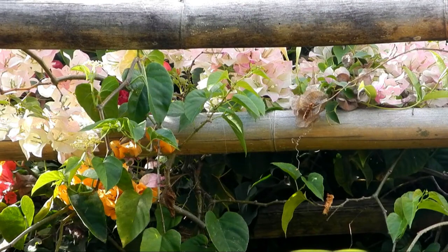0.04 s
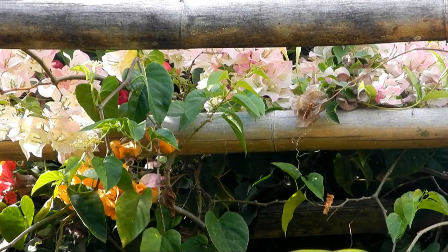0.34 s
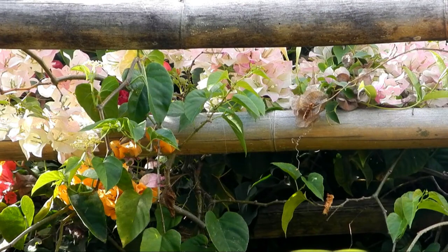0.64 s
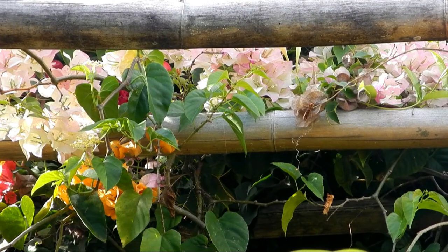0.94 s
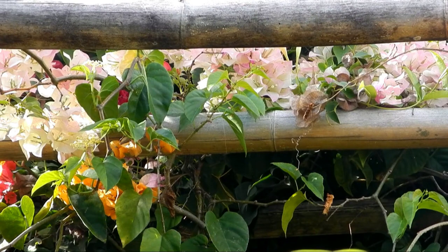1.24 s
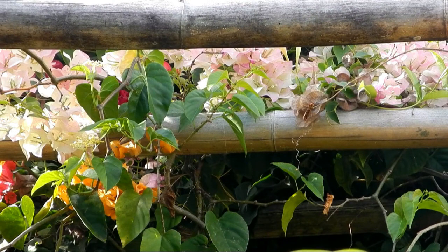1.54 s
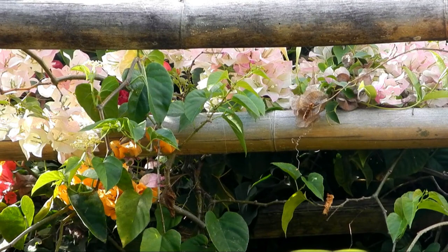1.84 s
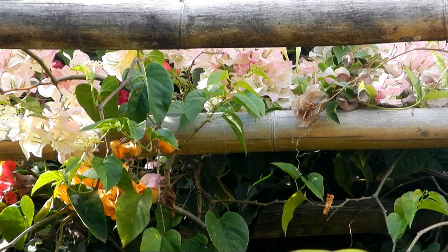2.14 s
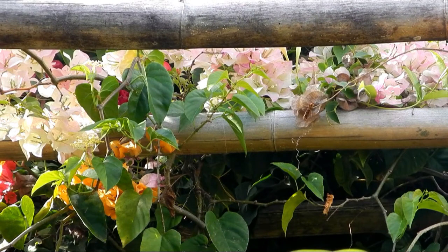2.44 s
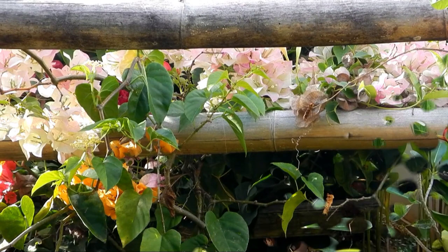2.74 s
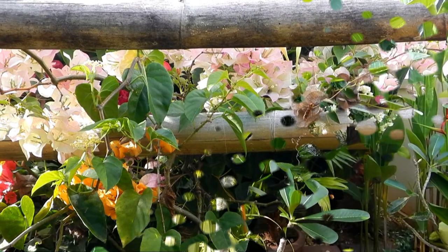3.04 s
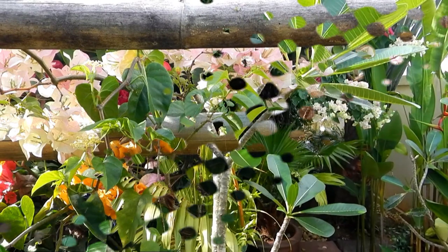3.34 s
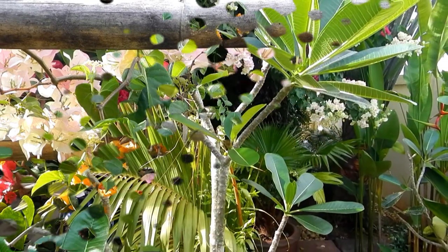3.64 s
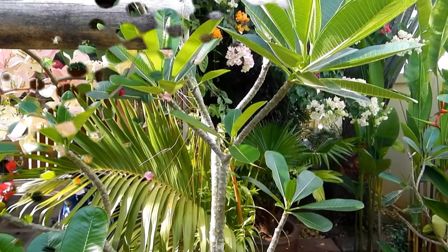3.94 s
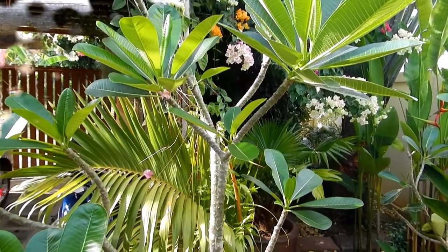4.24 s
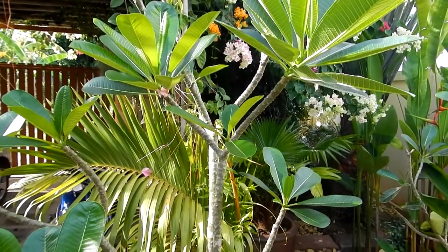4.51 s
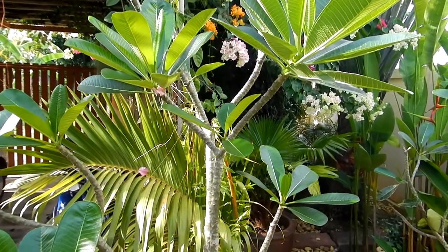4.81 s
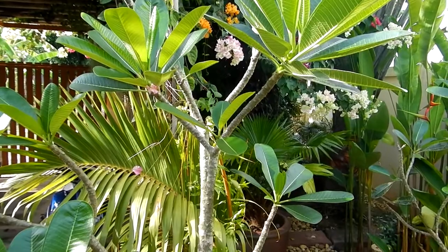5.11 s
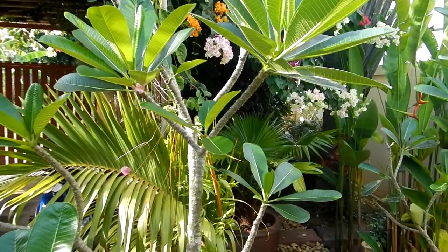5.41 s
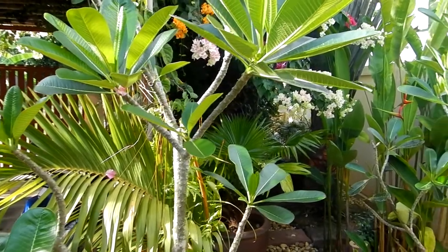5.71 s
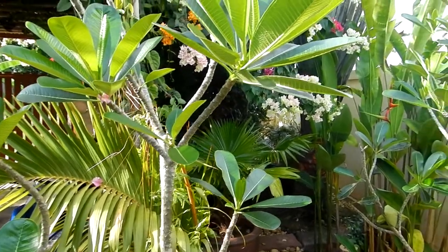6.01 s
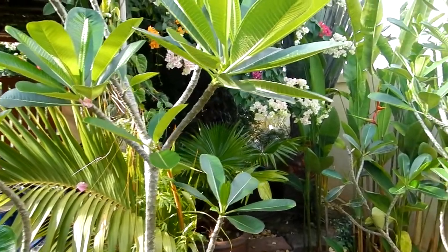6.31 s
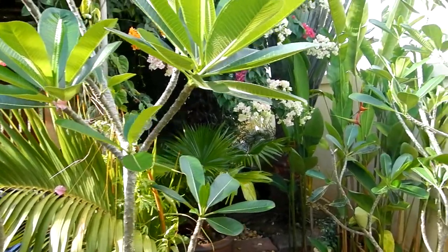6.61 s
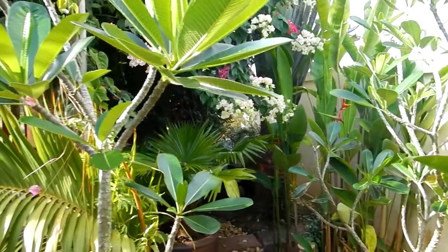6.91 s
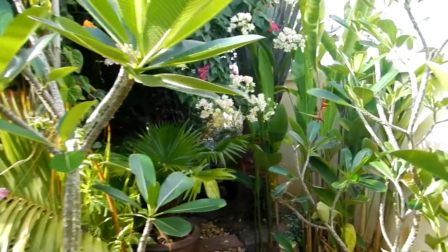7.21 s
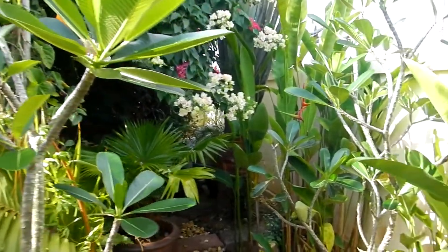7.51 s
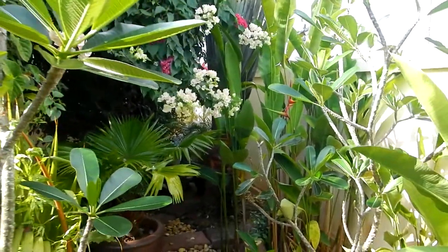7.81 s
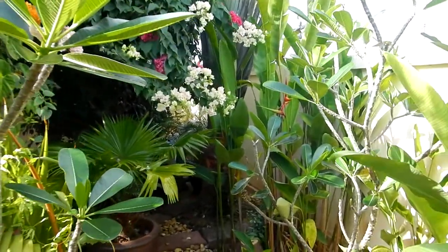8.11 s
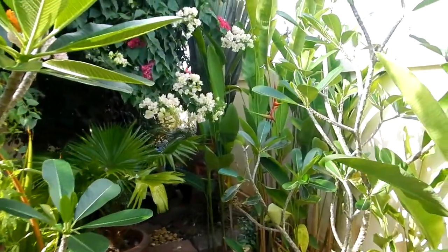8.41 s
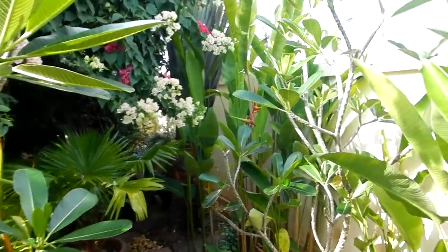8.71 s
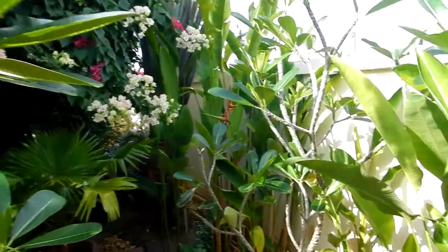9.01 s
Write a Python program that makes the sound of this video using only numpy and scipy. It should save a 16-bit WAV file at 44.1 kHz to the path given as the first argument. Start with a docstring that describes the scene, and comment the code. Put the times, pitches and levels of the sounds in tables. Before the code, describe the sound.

Birds sing and call to each other outdoors, near and far, with a soft low rumble of wind and distant traffic underneath.

```python
"""A near songbird whistles the same phrase twice in a walled tropical garden.
Another chatters and scolds; two further off answer each other with rising whoops.
Each syrinx gives a gliding tone, or a rasp when it vibrates chaotically; leaves and walls echo it.
Insects stridulate steadily, a breeze rumbles on the microphone, and a far engine passes
in a wash of town and leaves."""
import sys
import numpy as np
from scipy import signal
from scipy.fft import rfft, irfft, next_fast_len
from scipy.io import wavfile
from scipy.ndimage import uniform_filter1d

SR = 44100
rng = np.random.default_rng(int(sys.argv[2]) if len(sys.argv) > 2 else 0)


def inscribe(sig):
    """Save sig as 16-bit PCM at rate SR to the path in sys.argv[1].

    A 1-D sig is mono; a 2-D sig holds one channel per row.
    Samples are clipped to [-1, 1] before scaling.
    """
    pcm = np.round(np.clip(np.atleast_2d(sig).T, -1, 1) * 32767)
    wavfile.write(sys.argv[1], SR, pcm.astype(np.int16))


N = 403515
TIME = np.arange(N) / SR


def song(slur_accent=.85, slur_rough=.1):
    """Near songbird: a thin downward slur, then the same six whistles each time."""
    # songs: first whistle t/s, motif gain/dB, slur lead/s, slur level/dB
    songs = [(1.78, 0.36, .215, -52.5), (6.97, -0.4, .135, -46.5)]
    # slur: length/s, first f/Hz, mid f/Hz, last f/Hz
    slur = (.1, 6550, 5620, 4650)
    # whistles: offset t/s, length/s, first, mid, last f/Hz, level/dB, accent/0-1, roughness/0-1
    motif = [(0, .2, 4015, 3990, 3965, -38.5, 0.64, .24), (0.331, .16, 4120, 3412, 3063, -38, 0.69, 0.41),
             (0.677, .205, 2690, 2759, 2960, -37, 0.89, 0.22),
             (0.923, .16, 3330, 3355, 3400, -33.5, 0.5, .14),
             (1.051, .085, 3400, 3501, 3620, -33, .7, 0.44), (1.252, .16, 4194, 4340, 4390, -38, 0.28, .36)]
    rows = []
    for start_s, gain_db, lead_s, slur_db in songs:
        rows.append((start_s - lead_s, *slur, slur_db, slur_accent, slur_rough))
        rows += [(start_s + offset_s, length_s, *pitches_hz, gain_db + db, accent, rough)
                 for offset_s, length_s, *pitches_hz, db, accent, rough in motif]
    return notes(rows, waver=.0063, octave_db=-31, edge_db=-6.5)


def near_calls(rise_bow=.68, drop=.93, fall_bow=.72, rise_accent=.68, fall_accent=.42, rough=.5):
    """Husky rises, each followed by a fall from just under its top, and single whistles."""
    # two-note calls: t/s, rise/s, fall/s, first, top, last f/Hz, rise level/dB, fall level/dB
    up_downs = [(1.501, 0.12, 0.12, 2966, 3603, 2480, -40, -48),
                (3.458, 0.081, 0.2, 2195, 3073, 1980, -36.5, -49),
                (4.817, .12, 0.095, 3030, 3440, 2580, -39.5, -42.5)]
    # whistles: t/s, length/s, first, mid, last f/Hz, level/dB, accent/0-1, roughness/0-1
    whistles = [(3.39, .084, 2035, 2055, 2090, -49, .4, 0.11),
                (7.41, .276, 3124, 3132, 3420, -44.5, 0.14, .24)]
    rows = []
    for start_s, rise_s, fall_s, first_hz, top_hz, last_hz, rise_db, fall_db in up_downs:
        turn_hz = drop * top_hz
        rise_hz = (first_hz, first_hz + rise_bow * (top_hz - first_hz), top_hz)
        fall_hz = (turn_hz, turn_hz + fall_bow * (last_hz - turn_hz), last_hz)
        rows.append((start_s, rise_s, *rise_hz, rise_db, rise_accent, rough))
        rows.append((start_s + rise_s, fall_s, *fall_hz, fall_db, fall_accent, rough))
    return notes(rows + whistles, waver=.014, octave_db=-34, edge_db=-5)


def chatter(count=8, gap_s=.1695, end_s=.772, level_db=-34, end_pitch=.96, sag_per_s=.0954):
    """A husky phrase repeated at sinking pitch, already echoing as the scene opens."""
    # notes: offset t/s, length/s, first, mid, last base f/Hz, gain/dB, accent/0-1, roughness/0-1
    phrase = [(-.028, 0.044, 3100, 2660, 2540, 1, 0.93, 0.57),
              (0.019, 0.024, 2890, 3155, 3040, -7, 0.54, 0.66),
              (.032, 0.0156, 3530, 3820, 3680, -14.5, 0.36, .6),
              (0.056, 0.038, 2320, 2073, 1940, -6.5, 0.65, 0.75)]
    rows = []
    for before_s in gap_s * np.arange(count):
        start_s = 1 + end_s - before_s  # 1 s run-up, cut below
        pitch = end_pitch + sag_per_s * before_s
        rows += [(start_s + offset_s, length_s, *pitch * np.array(base_hz), level_db + db, accent, rough)
                 for offset_s, length_s, *base_hz, db, accent, rough in phrase]
    voice = notes(rows, waver=.0245, octave_db=-47, edge_db=-10)
    heard = garden(voice, direct_db=-1, early_db=-7, tail_db=-1, spread=.8, pan_db=-.5)
    return np.pad(heard[:, SR:], ((0, 0), (0, SR)))


def scolds():
    """Chaotic syrinx vibration: rasps around a falling pitch."""
    # harsh scolds: t/s, length/s, first f/Hz, last f/Hz, width/Hz, level/dB
    harsh = [(7.694, 0.062, 5770, 5110, 1270, -45), (7.732, 0.05, 4250, 2600, 1800, -45.5),
             (7.871, 0.04, 5960, 3850, 1500, -44), (8.222, 0.074, 9810, 8540, 4000, -58.5),
             (8.251, 0.044, 6080, 4530, 1500, -44.5), (8.266, .0483, 3910, 2985, 734, -35.5)]
    # a small bird's thin chips: t/s, level/dB
    chips = [(.01, -51), (.612, -61), (1.118, -58.5), (1.638, -59), (2.659, -56.5), (3.267, -62),
             (3.877, -60), (5.23, -61), (6.23, -60), (6.612, -56)]
    # one chip: length/s, first f/Hz, last f/Hz, width/Hz
    chip = (.05, 5550, 5050, 1460)
    out = np.zeros(N)
    for start_s, length_s, first_hz, last_hz, width_hz, db in harsh + [(s, *chip, db) for s, db in chips]:
        hz = np.linspace(first_hz, last_hz, int(length_s * SR))
        rasp = (chaos(len(hz), width_hz) * np.exp(2j * np.pi * np.cumsum(hz) / SR)).real
        add(out, start_s, gain_of(db) * unit_rms(rasp) * signal.windows.tukey(len(hz), .4))
    return out


def low_whoops():
    """The lower whooping bird: a held lead-in leaps to the top and slides down."""
    # bouts: first top t/s, count, gap/s, first, full top f/Hz, first, full level/dB, lead-in gain/dB
    bouts = [(3.15, 3, 0.21, 1547, 1685, -54, -50, -6), (4.46, 4, 0.23, 1427, 1600, -50, -44.5, -14),
             (5.597, 4, .315, 1091, 1497, -40.5, -32, 1.5), (8.455, 3, 0.26, 1327, 1586, -37, -33.5, -7)]
    # one whoop: unstretched t/s from the top, pitch height (top = 1), gain/dB
    course = [(-.135, .15, -14), (-.115, .1, 0), (-.08, -.1, -2), (-.038, 0, -1), (-.004, 1, -1),
              (.018, .88, 0), (.04, .35, -1), (.1, -.3, -12)]
    return whoops(bouts, course, waver=.0074, octave_db=-39)


def high_whoops():
    """The higher whooping bird: a yelp that leaps up and rings on at the top."""
    # bouts: first top t/s, count, gap/s, first, full top f/Hz, first, full level/dB, lead-in gain/dB
    bouts = [(4.36, 2, .33, 2540, 2700, -57, -52, 10), (5.27, 4, 0.28, 2596, 2740, -51, -51.5, -2),
             (8.305, 4, .247, 2220, 2760, -34.5, -39, -3)]
    # one yelp: unstretched t/s from the top, pitch height (top = 1), gain/dB
    course = [(-.135, .1, -14), (-.09, .05, -2), (-.045, .2, 0), (-.012, .95, -1), (.02, 1, 0),
              (.045, .8, -2), (.075, .35, -9), (.1, .2, -20)]
    return whoops(bouts, course, waver=.018, octave_db=-16)


def whoops(bouts, course, waver, octave_db, pace_s=.31, leap=.28, slowing=.025, shy_db=-16):
    """Effort grows through a bout, taking pitch, level and lead-in to their full values."""
    course_s, height, course_db = np.transpose(course)
    out = np.zeros(N)
    for start_s, count, gap_s, first_hz, full_hz, first_db, full_db, lead_db in bouts:
        stretch = gap_s / pace_s  # quicker bouts: shorter whoops, smaller leaps
        t = np.arange(course_s[0], course_s[-1], 1 / (SR * stretch))
        arch = uniform_filter1d(np.interp(t, course_s, height), size=500)
        lead_in = np.interp(t, [-.05, -.015], [1, 0])
        for k in range(round(count)):
            effort = 1 - .52 ** k
            top_hz = first_hz + effort * (full_hz - first_hz)
            hz = top_hz * (1 - leap * stretch * (1 - arch))
            db = first_db + effort * (full_db - first_db) + np.interp(t, course_s, course_db)
            db += lead_in * (lead_db + shy_db * (1 - effort))
            envelope = gain_of(db) * signal.windows.tukey(len(t), .08)
            top_s = start_s + gap_s * k * (1 + slowing * k)
            add(out, top_s + stretch * t[0], syrinx(hz, envelope, waver, octave_db))
    return out


def far_calls():
    """Single notes from birds further off."""
    # notes: t/s, length/s, first, mid, last f/Hz, level/dB, accent/0-1, roughness/0-1
    calls = [(.005, 0.11, 1230, 1160, 1077, -51, .3, 0.4), (1.19, .038, 7350, 7300, 7050, -56, .5, .3),
             (1.95, 0.063, 2780, 2780, 2760, -57.5, .5, .2), (2.1, .06, 2770, 2770, 2800, -56, .4, .2),
             (2.51, 0.037, 810, 974, 800, -43, 0.38, .106), (2.735, .0485, 602, 596, 588, -41, .235, .05),
             (2.765, 0.049, 1184, 1150, 1245, -49.5, .54, .1),
             (3.03, 0.098, 2820, 2760, 2730, -54, .57, .08), (3.19, .13, 2790, 2624, 2355, -57.5, .23, .06),
             (4.305, 0.027, 2000, 2000, 1890, -52, .5, .1), (6.49, .11, 2290, 2400, 2390, -54, .6, .35),
             (7.73, 0.088, 735, 673, 630, -50.5, .3, .1), (8.02, .09, 1882, 1984, 1991, -49, .5, 0.59),
             (8.22, 0.027, 1904, 1860, 1796, -42.5, .5, .1),
             (8.25, 0.081, 1145, 1243, 1234, -45, .39, 0.11),
             (8.345, 0.029, 1226, 1470, 1500, -44.5, .51, 0.24)]
    return notes(calls, waver=.012, octave_db=-28, edge_db=-2)


def notes(rows, waver, octave_db, edge_db):
    """Each note glides through three pitches; accent is its loudest point as a share of its length."""
    out = np.zeros(N)
    for start_s, length_s, *pitches_hz, db, accent, rough in rows:
        progress = np.linspace(0, 1, int(length_s * SR))
        hz = np.polyval(np.polyfit([0, .5, 1], pitches_hz, 2), progress)
        swell_db = np.interp(progress, [0, np.clip(accent, .05, .95), 1], [edge_db, 0, edge_db])
        envelope = gain_of(db + swell_db) * signal.windows.tukey(len(hz), .2)
        add(out, start_s, syrinx(hz, envelope, waver, octave_db, rough))
    return out


def syrinx(hz, envelope, waver, octave_db, rough=0.):
    """A trembling tone with a weak octave; roughness turns part of it into a rasp."""
    tremble = unit_rms(uniform_filter1d(rng.standard_normal(SR // 2), size=200))[:len(hz)]
    phasor = np.exp(2j * np.pi * np.cumsum(hz * (1 + waver * tremble)) / SR)
    rasp = np.sqrt(1 - rough ** 2) + rough * chaos(len(hz), width_hz=595)
    return envelope * (rasp * (phasor + gain_of(octave_db) * phasor ** 2)).real


def chaos(size, width_hz):
    """Irregular vibration as a band-limited complex envelope, rms about 1."""
    drive = rng.standard_normal((2, SR // 3))
    real, imag = signal.lfilter(*signal.butter(2, width_hz / 2, fs=SR), drive)
    return (unit_rms(real) + 1j * unit_rms(imag))[-size:] / np.sqrt(2)


def garden(voice, direct_db, early_db, tail_db, spread, pan_db, taps_per_s=2500):
    """Direct sound, quick scatter from leaves and walls, and a long tail between houses."""
    # echo decay: f/Hz, T60/s
    decay = [(500, 1.2), (1300, 1.8), (2700, 1.28), (4200, 1.02), (8000, 0.44)]
    t = np.arange(SR) / SR
    mid, side = rng.standard_normal((2, SR)) * (rng.random(SR) < taps_per_s / SR)
    taps = mid + np.array([[1], [-1]]) * spread * side
    hz, frame_s, spectra = signal.stft(taps, SR, nperseg=256)
    damping = gain_of(-60 * frame_s / at_hz(decay, hz)[:, None])
    tail = signal.istft(spectra * damping, SR, nperseg=256)[1][:, :SR] * np.clip(t / .014, 0, 1)
    early = taps[:, ::-1] * np.exp(-t / .011) * (t > .004)
    echo = gain_of(tail_db) * tail / np.linalg.norm(tail[0])
    echo += gain_of(early_db) * early / np.linalg.norm(early[0])
    heard = gain_of(direct_db) * voice + signal.fftconvolve(voice[None], echo, axes=1)[:, :N]
    return heard * gain_of(np.array([[pan_db], [-pan_db]]) / 2)


def birds():
    """The birds, placed by distance and side."""
    near = near_calls() + scolds()
    far = far_calls() + low_whoops()
    high = high_whoops()
    return (garden(song(), direct_db=-5, early_db=-8.5, tail_db=-6, spread=.25, pan_db=-1.5)
            + garden(near, direct_db=-3, early_db=-8.5, tail_db=-4, spread=.27, pan_db=-.5)
            + chatter()
            + garden(far, direct_db=-.5, early_db=-7.5, tail_db=-2, spread=.66, pan_db=-.2)
            + garden(high, direct_db=-6, early_db=-6, tail_db=-3, spread=.77, pan_db=-2))


def insects(level_db=-60.5):
    """Stridulation: five to seven chirps a second, each a flutter of quick wing strokes."""
    # sizzle spectrum: f/Hz, level/dB
    sizzle = [(6500, -51.5), (7400, -28), (7750, -9), (8050, -7.5), (8230, 0), (8350, -0.5), (8530, -1.5),
              (8850, -7.5), (9100, -30), (9600, -41), (11000, -69.5)]
    # chirp pace: t/s, rate/Hz
    chirp_rate = [(0, 5.1), (2.6, 5.1), (4.9, 5.5), (5.5, 6.7), (6.3, 5.17), (9.15, 5.17)]
    cycles = np.cumsum(np.interp(TIME, *np.transpose(chirp_rate))) / SR
    pulse_db = -2.2 * np.tanh(3 * np.cos(2 * np.pi * cycles))
    flutter = np.maximum(1 + .47 * wander(rate_hz=170), .08)
    return gain_of(level_db) * unit_rms(noise(sizzle, coherence=.948) * flutter * gain_of(pulse_db))


def breeze(calm_sway_db=-28.5, calm_buffet_db=-41.5, calm_pan_db=1.5):
    """Eddies press on each microphone port separately; gusts swell and die over the light air."""
    # gusts: t/s, half-length/s, sway level/dB, buffet level/dB, left over right/dB
    gusts = [(2.372, .18, -17.5, -34, 5), (2.873, 0.24, -19, -37, 10.5), (3.376, 0.095, -15.5, -42, 11.5),
             (3.845, 0.17, -17, -33, 2), (4.65, 0.34, -13, -29.5, -0.5), (5.222, .14, -12.5, -24, -3),
             (5.74, 0.094, -8.5, -26.5, 1), (6.08, 0.22, -11.5, -25.5, 0), (6.7, 0.23, -15.5, -37.5, 1.5),
             (7.387, 0.19, -17, -33, 1.5)]
    # slow pressure sway spectrum: f/Hz, level/dB
    sway = [(1, 4), (4, 11.5), (8, 16), (14, 8), (22, -4.5), (40, -53), (200, -140)]
    # buffeting spectrum: f/Hz, level/dB
    buffet = [(12, -31), (24, 2), (35, -5), (50, -12), (70, -13.5), (120, -32.5), (300, -50.5), (900, -120)]
    sides = np.array([[.5], [-.5]])
    sway_power = gain_of(calm_sway_db + sides * calm_pan_db) ** 2
    buffet_power = gain_of(calm_buffet_db + sides * calm_pan_db) ** 2
    for peak_s, half_s, sway_db, buffet_db, pan_db in gusts:
        swell = np.exp(-((TIME - peak_s) / half_s) ** 2) * gain_of(sides * pan_db) ** 2
        sway_power = sway_power + swell * gain_of(sway_db) ** 2
        buffet_power = buffet_power + swell * gain_of(buffet_db) ** 2
    return (noise(sway, coherence=.14) * np.sqrt(sway_power)
            + noise(buffet, coherence=.0263) * np.sqrt(buffet_power))


def engine(hum_db=-47, hum_from_s=4.68, hum_to_s=7.3, ramp_s=.3):
    """A far engine's drone swells and fades, holding a steady firing note midway."""
    # drone swell: t/s, level/dB
    swell = [(0, -74), (3.1, -63), (3.6, -43.5), (4.3, -47.5), (4.8, -41.5), (5.3, -45), (5.9, -43),
             (7.1, -44), (7.7, -48), (8.3, -60), (9.15, -62)]
    # drone spectrum: f/Hz, level/dB
    body = [(30, -39.5), (55, -21.5), (85, -5), (110, -3.5), (135, -0.5), (152, -19), (200, -23.5),
            (500, -31), (1500, -130)]
    # firing note spectrum: f/Hz, level/dB
    firing = [(100, -90.5), (122, -17), (129, 3), (135, -0.5), (142, -10.5), (175, -90.5), (400, -150)]
    drone = noise(body, coherence=.35) * gain_of(np.interp(TIME, *np.transpose(swell)))
    held = np.clip(np.minimum(TIME - hum_from_s, hum_to_s - TIME) / ramp_s + .5, 0, 1)
    hum = gain_of(hum_db) * held * noise(firing, coherence=.46) * gain_of([[2.5], [-2.5]])
    return (drone + hum) * gain_of([[1.2], [-1.2]])  # to the left


def wash(level_db=-44.5):
    """Distant town and leaves: a steady, slightly wavering noise."""
    # wash spectrum: f/Hz, level/dB
    air = [(30, 0.5), (100, 2.5), (200, -5.5), (400, -9.5), (800, -13), (1300, -15), (1900, -21.5),
           (3000, -27), (5200, -29), (7000, -34), (10200, -35.5), (12000, -39.5), (15000, -41)]
    # left-right likeness: f/Hz, coherence/0-1
    coherence = [(30, 0.19), (200, 0.32), (600, 0.33), (2000, 0.327), (4000, 0.99), (12000, 1)]
    return noise(air, coherence) * gain_of(level_db + .5 * wander(rate_hz=10))


def noise(spectrum, coherence):
    """Coloured stereo noise, rms 1; left-right coherence is a number or a table over frequency."""
    size = next_fast_len(N)
    hz = np.fft.rfftfreq(size, 1 / SR)
    left, other = rfft(rng.standard_normal((2, size)))
    shared = at_hz(coherence, hz) if np.ndim(coherence) else coherence
    pair = np.array([left, shared * left + np.sqrt(1 - shared ** 2) * other])
    return unit_rms(irfft(pair * gain_of(at_hz(spectrum, hz)), size)[:, :N])


def wander(rate_hz):
    """Smooth random drift, rms 1."""
    size = next_fast_len(N)
    lowpass = np.exp(-(np.fft.rfftfreq(size, 1 / SR) / rate_hz) ** 2)
    return unit_rms(irfft(rfft(rng.standard_normal(size)) * lowpass, size)[:N])


def at_hz(points, hz):
    """Interpolates a table on a log-frequency axis."""
    points_hz, value = np.transpose(points)
    return np.interp(np.log(hz + 1), np.log(points_hz + 1), value)


def gain_of(db):
    """Decibels to amplitude."""
    return 10 ** (np.asarray(db) / 20)


def unit_rms(x):
    """Scales to rms 1."""
    return x / np.sqrt(np.mean(x ** 2) + 1e-20)


def add(mix, start_s, sound):
    """Mixes a sound in, dropping what falls outside."""
    at = round(start_s * SR)
    sound = sound[max(-at, 0):]
    part = mix[max(at, 0):][:len(sound)]
    part += sound[:len(part)]


def scene():
    """The whole garden, in stereo."""
    return engine() + wash() + breeze() + insects() + birds()


def record(dry, fade_s=.008, cutoff_hz=15230):
    """Soft start and stop, then a steep low-pass."""
    fade = np.clip(np.minimum(TIME, TIME[-1] - TIME) / fade_s, 0, 1)
    lowpass = signal.firwin(511, cutoff_hz, window=("kaiser", 9), fs=SR)
    return signal.oaconvolve(dry * fade, lowpass[None], "same")


dry = scene()
out = record(dry)
inscribe(out)
```